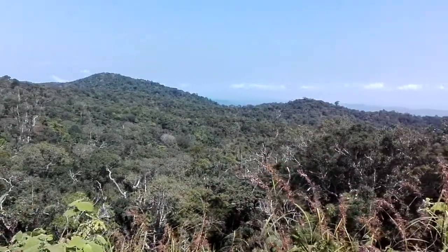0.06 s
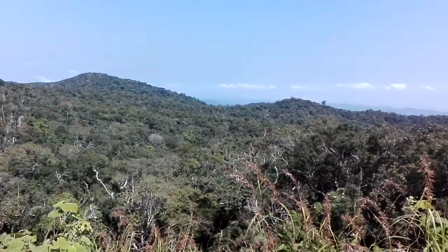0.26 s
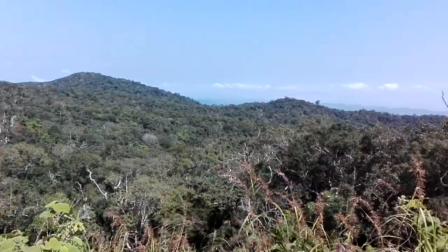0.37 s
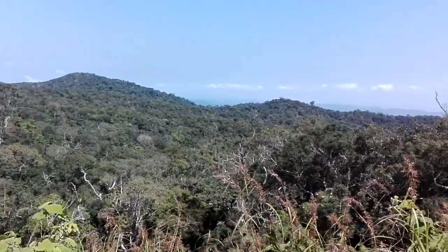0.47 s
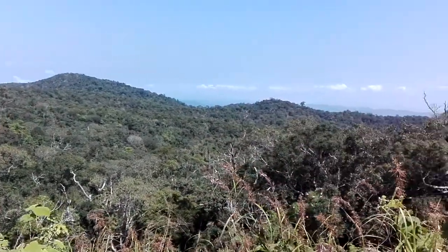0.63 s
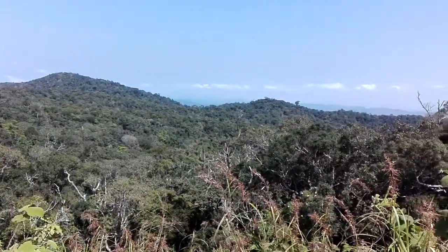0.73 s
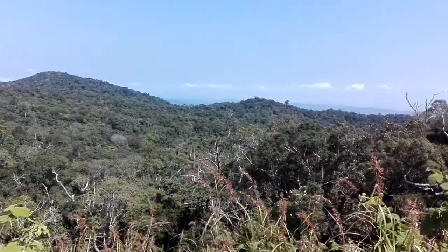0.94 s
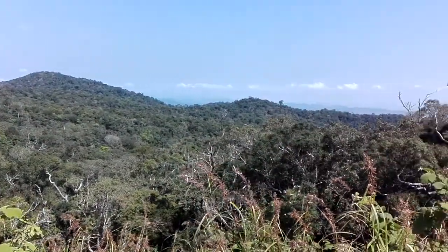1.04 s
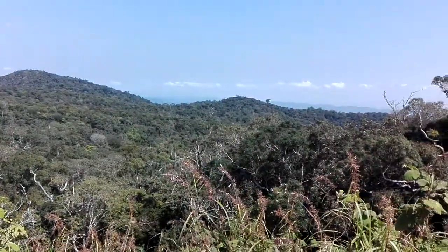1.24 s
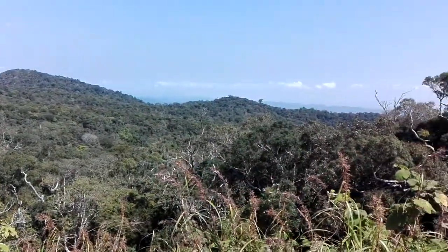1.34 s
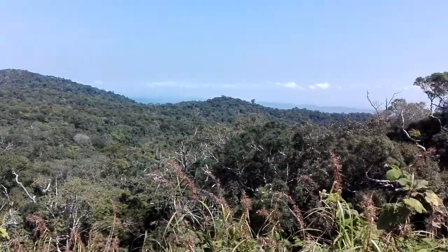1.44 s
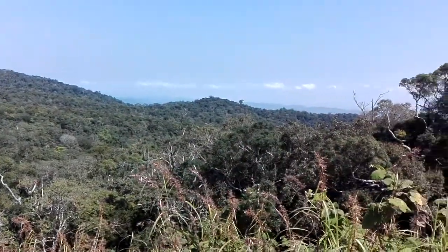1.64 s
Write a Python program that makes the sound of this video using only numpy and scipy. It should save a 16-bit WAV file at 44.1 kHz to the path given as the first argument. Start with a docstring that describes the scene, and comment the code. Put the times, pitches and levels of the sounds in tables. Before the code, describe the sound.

Low wind buffets the microphone as a hand softly bumps it, over faint forest air.

```python
"""A light breeze rumbles and buffets on the microphone of a hand-held camera on a quiet, wooded hillside.
The hand knocks the case three times, the first a double hit: dull thumps with a short, low wobble.
Behind them lies a wide bed of forest air and hissing insects, and a distant bird gives two rising
whistles. Near the end a high brushing hiss swells over a soft rustle of leaves."""
import sys
import numpy as np
from scipy import signal
from scipy.fft import rfft, irfft
from scipy.io import wavfile
from scipy.ndimage import uniform_filter1d

SR = 44100
rng = np.random.default_rng(int(sys.argv[2]) if len(sys.argv) > 2 else 0)


def put_to_file(sound):
    """Save the sound as 16-bit audio at rate SR, in the file named by the first command-line argument."""
    columns = np.atleast_2d(sound).T  # one column per channel
    safe = np.clip(columns, -1, 1)
    whole_steps = np.round(safe * 32767)
    wavfile.write(sys.argv[1], SR, whole_steps.astype(np.int16))


N = 74970

# gusts on the microphone (time [s], level [dB])
GUST_LEVELS = [(0, -71), (.035, -55), (.085, -69), (.18, -56.5), (.28, -47.5), (.32, -48), (.45, -54.5),
               (.54, -53.5), (.59, -49), (.625, -67.5), (.75, -61.5), (.87, -70), (1.0, -68.5), (1.04, -60),
               (1.16, -68.5), (1.35, -60), (1.52, -50.5), (1.62, -57), (1.69, -46.5)]
# their low rumble (frequency [Hz], relative level [dB])
RUMBLE_COLOUR = [(12, -9.5), (22, -9.5), (36, 1.5), (58, -9), (77, -4.5), (105, -21.5), (150, -28),
                 (220, -42.5), (400, -53), (900, -74)]
# air fluttering around the case (frequency [Hz], relative level [dB])
FLUTTER_COLOUR = [(20, -3), (70, -2.5), (130, -1), (190, -6), (270, -12), (370, -20.5), (520, -32),
                  (1000, -49.5)]
# far forest air (frequency [Hz], relative level [dB])
FOREST_COLOUR = [(100, 0), (450, -2), (680, -3.5), (1200, 0), (1650, -1.5), (2300, -5.5), (3500, -5.5),
                 (6000, -8), (11000, -8), (14000, -9)]
# far insect chorus (time [s], level [dB])
INSECT_LEVELS = [(0, -86), (.2, -82.5), (.6, -84), (1.0, -84.5), (1.3, -83.5), (1.7, -88.5)]
# hand on the case (time [s], level [dB], pitch [Hz], firm core relative to the bump [dB])
HAND_BUMPS = [(0.2251, -27, 73.2, -17), (0.2559, -32, 81, -26), (0.574, -38, 88.6, -33),
              (.629, -55.5, 148, -42)]
# single eddies on the microphone (time [s], level [dB], pitch [Hz])
EDDY_HITS = [(.381, -36, 40), (.444, -39, 36.4), (.502, -41, 40.3)]
# bird calls (start [s], length [s], start pitch [Hz], end pitch [Hz], midway level [dB], swell [dB/s])
BIRD_WHISTLES = [(0.919, .235, 3194, 5400, -81, 28), (1.353, 0.15, 3277, 4990, -81.5, -40)]
# swell of the leaves (time [s], level [dB])
LEAF_LEVELS = [(1.1, -100), (1.35, -81.5), (1.44, -76), (1.52, -76.5), (1.6, -77.5), (1.68, -74)]
# tone of the leaves (frequency [Hz], relative level [dB])
LEAF_COLOUR = [(500, -16.5), (1100, -6), (1550, -2), (2200, -4), (3200, -7), (4200, -16.5), (5400, -3),
               (6300, -12), (7500, -3.5), (12000, -21)]
# swell of the brushing hiss (time [s], level [dB])
HISS_LEVELS = [(1.25, -100), (1.39, -77.5), (1.44, -71), (1.505, -65), (1.56, -69), (1.595, -71.5),
               (1.64, -69), (1.68, -65)]
# tone of the brushing hiss (frequency [Hz], relative level [dB])
HISS_COLOUR = [(4000, -34.5), (6500, -15.5), (7400, -17.5), (9000, -13.5), (10300, -9.5), (10850, -3.5),
               (11150, -1.5), (12400, -0.5), (14000, -12)]
# stereo width of the background (frequency [Hz], side relative to mid [dB])
STEREO_WIDTH = [(60, -44), (98, -43), (160, -41), (260, -29), (430, -22.5), (700, -22.5), (1150, -39),
                (1890, -32.5), (3090, -36), (5060, -15), (8280, -5.5), (13600, -6.5)]


def from_db(db):
    """Decibels to gain."""
    return 10 ** (np.asarray(db) / 20)


def rms_one(x):
    """Scale to an rms of 1."""
    return x / np.sqrt(np.mean(x ** 2) + 1e-20)


def seconds():
    """Time of every sample."""
    return np.arange(N) / SR


def fader(rows):
    """Gain ride through (time [s], level [dB]) points."""
    return from_db(np.interp(seconds(), *np.transpose(rows)))


def bins():
    """Frequency of every spectral bin, at least 1 Hz."""
    return np.maximum(np.arange(N // 2 + 1) * SR / N, 1)


def eq(points):
    """EQ curve through (frequency [Hz], level [dB]) points."""
    hz, db = np.transpose(points)
    return from_db(np.interp(np.log(bins()), np.log(hz), db))


def noise(gains):
    """Noise shaped by an EQ curve, rms 1."""
    return rms_one(irfft(rfft(rng.standard_normal(N)) * gains, N))


def drift(rate_hz):
    """Random modulator that rolls off above its rate, rms 1."""
    return noise(1 / (1 + (bins() / rate_hz) ** 2))


def flicker(rate_hz, depth_db):
    """A gain that wanders at random."""
    return from_db(depth_db * drift(rate_hz))


def wide_noise(gains):
    """Stereo noise that is centred in the bass and opens up in the treble."""
    mid, side = rfft(rng.standard_normal((2, N))) * gains
    mid, side = irfft(mid, N), irfft(side * eq(STEREO_WIDTH), N)
    return (mid + side * [[1], [-1]]) / mid.std()


def thumps(rows, width_cycles):
    """Soft pushes: the pressure swings once each way under a bell-shaped envelope."""
    out = np.zeros(N)
    for time, db, hz in rows:
        cycles = (seconds() - time) * hz
        bell = np.exp(-.5 * (cycles / width_cycles) ** 2)
        out += from_db(db) * bell * np.sin(2 * np.pi * cycles)
    return out


def breeze():
    """Gusts rumble on the microphone over a steady flutter of air around the case."""
    rumble = noise(eq(RUMBLE_COLOUR))
    rumble /= np.sqrt(uniform_filter1d(rumble ** 2, size=2600, mode="wrap"))  # even out before the fader
    flutter = rms_one(noise(eq(FLUTTER_COLOUR)) * flicker(rate_hz=17, depth_db=.53))
    return fader(GUST_LEVELS) * rumble + from_db(-69) * flutter


def forest_air():
    """The far forest lays down a smooth, even hiss."""
    return from_db(-75) * wide_noise(eq(FOREST_COLOUR))


def insects(centre_hz=9300, spread_hz=650):
    """A far chorus blurs into one shrill, shimmering band."""
    band = np.exp(-.25 * ((bins() - centre_hz) / spread_hz) ** 2)
    return fader(INSECT_LEVELS) * wide_noise(band) * flicker(rate_hz=110, depth_db=2.8)


def hand_bumps(width_cycles=.28, core_pitch_ratio=2.13):
    """The hand lands dull thumps with a firmer core, each setting the case wobbling."""
    bodies = [(time, db, hz) for time, db, hz, _ in HAND_BUMPS]
    cores = [(time, db + core_db, hz * core_pitch_ratio) for time, db, hz, core_db in HAND_BUMPS]
    push = thumps(bodies, width_cycles) + thumps(cores, width_cycles)
    return push + .48 * case_wobble(push)


def case_wobble(push, pitch_hz=69.4, t60_s=.086):
    """The case answers a push with one low, quickly damped resonance."""
    decay = from_db(-60 / (t60_s * SR))
    feedforward = np.array([1, 0, -1]) * (1 - decay ** 2) / 2
    feedback = [1, -2 * decay * np.cos(2 * np.pi * pitch_hz / SR), decay ** 2]
    return signal.lfilter(feedforward, feedback, push + 1e-18)


def eddies():
    """Single eddies buffet the microphone with sub-bass puffs."""
    return -thumps(EDDY_HITS, width_cycles=.45)


def bird(attack_s=.025, release_s=.055, waver_hz=20):
    """Pure upward glides that waver and fade on their long way through the air."""
    out = np.zeros(N)
    for start, length, low_hz, high_hz, db, swell in BIRD_WHISTLES:
        age = np.clip(seconds() - start, 0, length)
        hz = low_hz + (high_hz - low_hz) * age / length + waver_hz * drift(rate_hz=100)
        envelope = np.minimum(age / attack_s, 1) * np.minimum((length - age) / release_s, 1)
        gain = from_db(db + swell * (age - length / 2)) * flicker(rate_hz=32, depth_db=1.2)
        out += gain * envelope * np.sin(2 * np.pi * np.cumsum(hz) / SR)
    return out


def leaves():
    """Leaves stir in a soft, grainy rustle."""
    return fader(LEAF_LEVELS) * wide_noise(eq(LEAF_COLOUR)) * flicker(rate_hz=250, depth_db=1.3)


def brushing_hiss():
    """A bright, fine-grained hiss swells, dips and swells again."""
    return fader(HISS_LEVELS) * wide_noise(eq(HISS_COLOUR)) * flicker(rate_hz=290, depth_db=1.5)


def scene():
    """Wind, hand and bird sit dead centre in the wide forest."""
    centre = breeze() + hand_bumps() + eddies() + bird()
    return centre + forest_air() + insects() + leaves() + brushing_hiss()


def record(dry):
    """A steep high cut takes off the very top."""
    cutoff_hz = 14260
    high_cut = signal.ellip(14, .1, 70, cutoff_hz, fs=SR, output="sos")
    return signal.sosfilt(high_cut, dry)


dry = scene()
out = record(dry)
put_to_file(out)
```